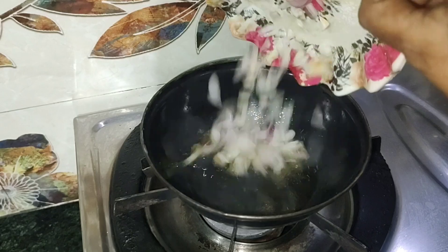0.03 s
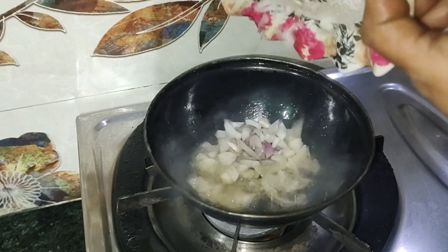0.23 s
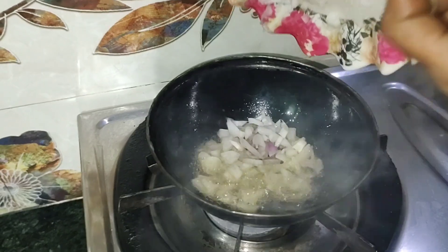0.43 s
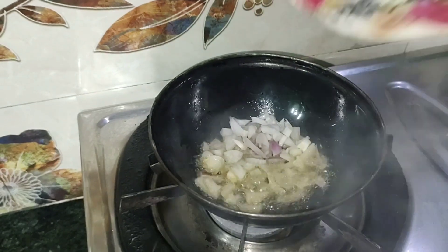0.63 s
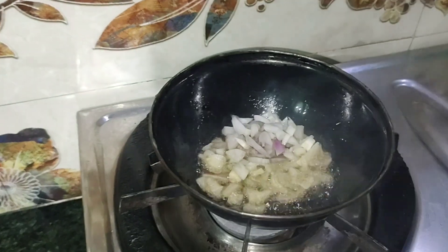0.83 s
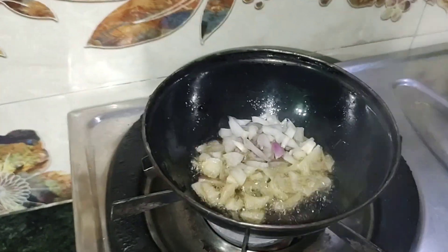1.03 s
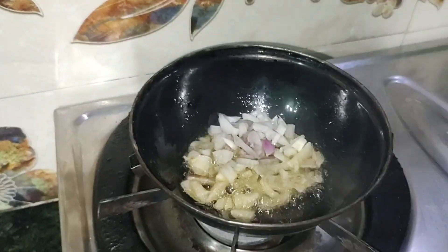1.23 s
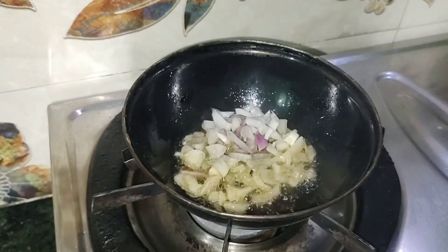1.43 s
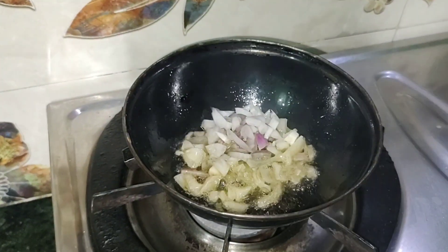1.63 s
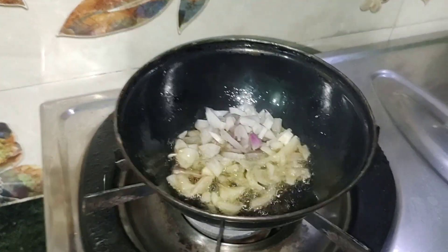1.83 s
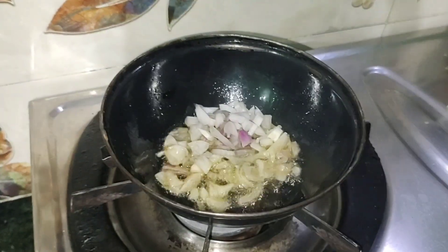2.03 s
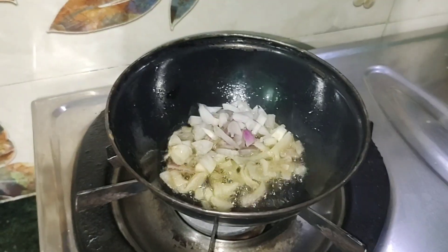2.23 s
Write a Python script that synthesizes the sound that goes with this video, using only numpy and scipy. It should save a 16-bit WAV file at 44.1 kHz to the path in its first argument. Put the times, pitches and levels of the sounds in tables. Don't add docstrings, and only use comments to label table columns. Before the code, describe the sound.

Loud frying sizzle as wet onions hit hot oil in a pan, spitting sharply, then easing.

```python
import sys
import numpy as np
from scipy import signal
from scipy.fft import rfft, irfft, next_fast_len
from scipy.io import wavfile
from scipy.ndimage import map_coordinates

SR = 44100
rng = np.random.default_rng(int(sys.argv[2]) if len(sys.argv) > 2 else 0)


def volts(x):
    e = np.asarray(x, float) / 20
    return 10 ** e


def int16_out(signal):
    q = np.round(np.clip(np.atleast_2d(signal).T, -1, 1) * 32767)
    wavfile.write(sys.argv[1], SR, q.astype(np.int16))


N = 100283
PLACES = 20


def unit(x):
    return x / np.sqrt(np.mean(x ** 2) + 1e-20)


def along(points, hz):
    f, value = np.transpose(points)
    return np.interp(np.log(hz + 1), np.log(f + 1), value)


def curve(rows):
    return np.interp(np.arange(N) / SR, *np.transpose(rows))


def wobble(rate):
    knots = rng.standard_normal(N // 100)
    return map_coordinates(knots, [np.arange(N) * rate / SR])


def filtered(x, response):
    m = next_fast_len(N + SR // 2)
    hz = np.fft.rfftfreq(m, 1 / SR)
    return irfft(rfft(x, m) * response(hz), m)[..., :N]


def peaks(table):
    def response(f):
        total = 0
        for k, (centre, width, db) in enumerate(table):
            damping = 1j * f * width
            total = total + (-1) ** k * volts(db) * damping / (centre * centre - f * f + damping)
        return total
    return response


# (time [s], level [dB])
BOIL_STRENGTH = [(0, -58), (.028, -62), (.05, -39), (.07, -27), (.1, -23), (.2, -21.5), (.25, -18.5),
                 (.42, -19.5), (.55, -21), (.63, -21.5), (.72, -24), (.95, -25), (1.17, -26.5), (1.25, -27),
                 (1.6, -28.5), (1.8, -27.5), (2.27, -29.5)]


def sizzle():
    surge_db = 0.42 * wobble(9.61) + 0.37 * wobble(39.81)
    boil = volts(curve(BOIL_STRENGTH) + surge_db)
    return boil * (fizz() + bowl()) / np.sqrt(PLACES)


# (frequency [Hz], level [dB])
FIZZ_SPECTRUM = [(500, -45), (900, -7), (1850, -23.5), (2100, -6), (2900, -8.5), (5400, -4), (12000, -3),
                 (15700, -3)]


def fizz():
    ringing = bubbles(count=20000, low_hz=1500, high_hz=16900, cycles=5.8, spread_db=2.0, size=96)
    ticks = bubbles(count=2500, low_hz=3040, high_hz=16000, cycles=1.66, spread_db=3.5, size=48)
    steam = rng.standard_normal((PLACES, N))
    mix = ringing + volts(-6) * ticks + volts(-4.5) * steam
    return unit(filtered(mix, lambda hz: volts(along(FIZZ_SPECTRUM, hz))))


# (frequency [Hz], width [Hz], level [dB])
BOWL_MODES = [(1004, 127, 1), (1644, 355, -1.5), (2400, 245, -7.5)]


def bowl():
    level_db, dries_db_per_s, dry_s = -13, 9, 1.42
    big = bubbles(count=5000, low_hz=820, high_hz=2800, cycles=1.43, spread_db=2.5, size=256)
    big = unit(filtered(big, lambda hz: peaks(BOWL_MODES)(hz) * hz ** 2 / (hz ** 2 + 700 ** 2)))
    wet_db = level_db - dries_db_per_s * np.minimum(np.arange(N) / SR, dry_s)
    return volts(wet_db) * big


def bubbles(count, low_hz, high_hz, cycles, spread_db, size):
    when, pitch, ring, strength = rng.random((count, 4)).T
    hz = low_hz + (high_hz - low_hz) * pitch
    gain = np.sqrt(hz) * volts(-spread_db * np.log(1.002 - strength))
    return unit(bursts(when * N / SR, hz, cycles * (0.6 + 0.43 * ring), gain, size))


def bursts(s, hz, cycles, gain, size):
    u = np.arange(size) / SR * (hz / cycles)[:, None]
    envelope = np.e * 3 * u * np.exp(-3 * u)
    wave = gain[:, None] * envelope * np.sin(2 * np.pi * u * cycles[:, None])
    row = N + size
    start = (s * SR).astype(int) + np.arange(len(s)) % PLACES * row
    at = start[:, None] + np.arange(size)
    return np.bincount(at.ravel(), wave.ravel(), PLACES * row).reshape(PLACES, -1)[:, :N]


# (time [s], peak level [dB], pitch [Hz], ring length [cycles])
SPITTING_DROPS = [(.118, -10, 4000, 1.1), (0.169, -11, 11000, 1.2), (.196, 0, 11000, 1.8),
                  (0.223, 3, 9000, 1.2), (.236, -8, 5400, 3.8), (.296, -1, 4960, 2.1), (0.343, 1, 8000, 1),
                  (.386, 0, 7960, 1.2), (0.425, -0.5, 8000, 0.76), (.438, -9, 6500, 0.67),
                  (.519, -14, 6500, 1.5), (0.566, -9, 5000, 1.9), (.6652, -2.5, 4530, 1),
                  (0.683, -11, 8000, 0.86), (.998, -21, 4450, 4), (1.002, -4.5, 10400, 1.2),
                  (1.075, -6, 5000, 1.5), (1.113, -13, 7500, 2.3), (1.129, -7, 12500, 1.6),
                  (1.145, -10, 9500, 1.4), (1.182, -1, 11000, 0.85), (1.192, -12, 6500, 3),
                  (1.227, -9.5, 6370, 3), (1.605, -11, 5500, 1.2), (1.615, -12, 6500, 1.7),
                  (1.6505, 0, 9000, 0.83), (1.764, -6, 12500, 1.5), (1.773, -14.5, 5450, 4.6),
                  (1.830, -6, 12000, 1.5), (2.150, -13.5, 4970, 2)]
# (time [s], peak level [dB], pitch [Hz], ring length [cycles])
LATER_DROPS = [(1.4294, -10, 8780, 2.3), (1.5384, -14, 9930, 2.3), (1.8724, -8, 12800, 2),
               (1.8814, -9, 12800, 2), (1.9404, -12, 9540, 2), (1.9604, -12, 12500, 2),
               (2.0744, -13, 9440, 2), (2.0884, -10, 11200, 2), (2.1334, -10, 11900, 2),
               (2.174, -8, 11800, 2), (2.197, -12, 5550, 2.2), (2.2053, -10, 8080, 2.2),
               (2.224, -6, 9900, 2)]


def spits():
    burst_db, spray_db, spray_t60 = -2, -9, 0.0083
    s, db, hz, cycles = np.transpose([*SPITTING_DROPS, *LATER_DROPS])
    cycles = np.clip(cycles, .5, 12)
    centre = hz[:, None]
    width = (3.8 * hz / cycles)[:, None]

    def band(f):
        return (f * width / np.abs(centre * centre - f * f + 1j * f * width)) ** 2

    drops = bursts(s, hz, cycles, volts(db + burst_db), size=400)
    drops = drops + sprays(s, db + spray_db, band, spray_t60)
    return filtered(drops, lambda f: (f / (f - 1500j)) ** 2)


# (time [s], peak level [dB], lowest pitch [Hz])
WET_BUBBLES = [(.088, -22.5, 950), (.117, -17, 2000), (0.202, -26, 2100), (0.319, -19, 900),
               (0.551, -23, 1400), (.567, -21, 1300), (0.618, -21, 1000), (.665, -16, 900),
               (.75, -25.5, 1400), (.86, -25, 950), (1.145, -26.5, 950), (1.163, -18.5, 2100),
               (1.192, -22.5, 2000), (1.606, -21.5, 1450), (1.615, -25, 1500), (1.642, -25, 1450),
               (1.774, -28, 2100), (1.91, -30, 1500), (2.146, -25, 2000)]


def splutters():
    s, db, hz = np.transpose(WET_BUBBLES)
    low, span = hz[:, None], 3.5
    return sprays(s, db, lambda f: (f > low) / (1 + (f / (span * low)) ** 2), t60=0.023)


def sprays(s, db, band, t60):
    size, rise_s = 2048, 0.00038
    t = np.arange(size) / SR
    noise = irfft(rfft(rng.standard_normal((len(s), size))) * band(np.fft.rfftfreq(size, 1 / SR)))
    envelope = (1 - np.exp(-t / rise_s)) * volts(-60 * t / t60)
    noise *= envelope / noise.std(axis=1, keepdims=True)
    place = np.arange(len(s))[:, None] % PLACES
    sample = (s * SR).astype(int)[:, None] + np.arange(size)
    out = np.zeros((PLACES, N))
    np.add.at(out, (place, sample), volts(db)[:, None] * noise)
    return out


# (left level [dB], right level [dB])
REFLECTED_DB = [-5.5, 3]
# (left level [dB], right level [dB])
DIRECT_DB = [2.5, -2.5]
# (frequency [Hz], left over right [dB])
PORT_BALANCE = [(60, 4), (180, -8), (550, -8.5), (1650, 4), (4970, 3), (15000, -1)]


def tiles(x):
    t60, rise_s, apart_s = .03, 0.001, .00015
    t = np.arange(SR // 10) / SR
    answer = rng.standard_normal((2, PLACES, len(t))) * volts(-60 * t / t60) * (1 - np.exp(-t / rise_s))
    answer *= volts(REFLECTED_DB)[:, None, None] / np.linalg.norm(answer, axis=2, keepdims=True)
    late = (rng.random(PLACES) * apart_s * SR).astype(int)
    answer[0, :, 0] = volts(DIRECT_DB[0])
    answer[1, np.arange(PLACES), late] = volts(DIRECT_DB[1])
    out = signal.fftconvolve(x[None], answer, axes=2)[..., :N].sum(axis=1)
    half = np.array([[.5], [-.5]])
    return filtered(out, lambda hz: volts(along(PORT_BALANCE, hz) * half) * (hz / (hz - 600j)) ** 2)


def clatter():
    level_db, t60 = -35, 1.83
    modes = peaks([(188, 25, 1), (310, 70, 0), (750, 250, -10)])
    plate = pair(lambda hz: np.abs(modes(hz)) * hz / (hz + 100) / (1 + (hz / 950) ** 6))
    return volts(level_db - 60 * np.arange(N) / SR / t60) * plate


# (time [s], level [dB])
HUM_GAIN = [(0, -39.5), (.25, -44.5), (.5, -48), (.65, -45), (.78, -42.5), (.94, -42.5), (1.02, -45),
            (1.3, -45), (1.63, -43), (1.85, -50), (2.08, -48.5), (2.27, -44.5)]
# (frequency [Hz], width [Hz], level [dB])
STANDING_WAVES = [(50, 4.6, -8), (101.2, 30.8, 1), (205, 29.3, -7), (300, 37, -11.5), (653, 56, -41.5)]
# (frequency [Hz], level per hertz [dB])
AIR_NOISE = [(20, -14), (200, -22.5), (800, -21.5), (1200, -30), (2000, -30), (6000, -58), (16000, -80)]
# (frequency [Hz], level relative to the hum [dB])
MOTOR_LINES = [(54, -10), (97, -8), (112, -8)]


def kitchen():
    t = np.arange(N) / SR
    hum = pair(lambda hz: np.abs(peaks(STANDING_WAVES)(hz)) + volts(along(AIR_NOISE, hz)))
    for hz, db in MOTOR_LINES:
        phase = 2 * np.pi * hz * t + 0.75 * wobble(2.92)
        hum = hum + volts(db + 2.3 * wobble(3)) * np.sin(phase)
    return volts(curve(HUM_GAIN)) * hum


# (frequency [Hz], left-right likeness [0 to 1])
LIKENESS = [(60, 1), (240, 0.97), (950, 0.28), (3770, 1), (15000, 0.074)]


def pair(response):
    def mid_side(hz):
        angle = np.arccos(np.clip(along(LIKENESS, hz), -1, 1)) / 2
        return response(hz) * [np.cos(angle), np.sin(angle)]

    mid, side = filtered(rng.standard_normal((2, N)), mid_side)
    return unit(np.array([mid + side, mid - side]))


def scene():
    return tiles(sizzle() + spits() + splutters()) + clatter() + kitchen()


# (time [s], hold [s], left level [dB], right level [dB])
DUCKINGS = [
    (0.57, 0.093, -4, -1),
    (1.012, 0.1, -0.5, -5),
    (1.662, 0.081, -4, -1.5),
]


def gain_control(x):
    edge_s = 0.0061
    t = np.arange(N) / SR
    duck_db = 0
    for s, hold, left, right in DUCKINGS:
        inside = np.clip(np.minimum(t - s, s + hold - t) / edge_s + .5, 0, 1)
        duck_db = duck_db + np.array([[left], [right]]) * inside
    return x * volts(duck_db)


def band_limit(x):
    return signal.sosfilt(signal.butter(12, 17040, fs=SR, output="sos"), x)


def record(dry):
    ceiling, top_hz = .9, 15750
    x = gain_control(dry)
    x = x / (1 + np.abs(x / ceiling) ** 4) ** (1 / 4)
    x = filtered(x, lambda hz: 1 / (1 + (hz / top_hz) ** 200))
    return band_limit(x)


dry = scene()
out = record(dry)
int16_out(out)
```